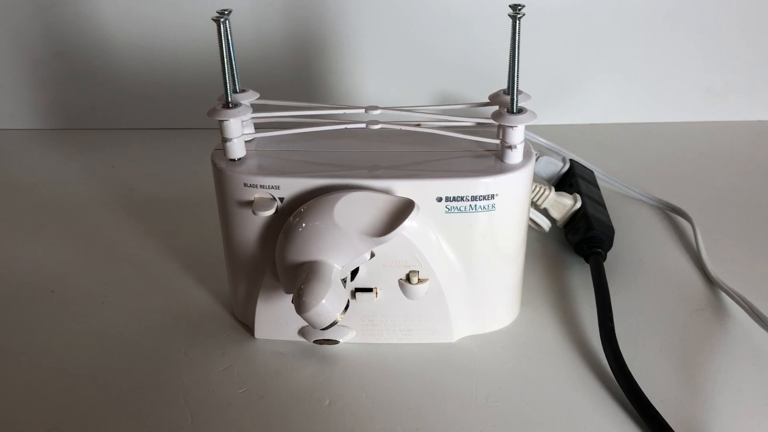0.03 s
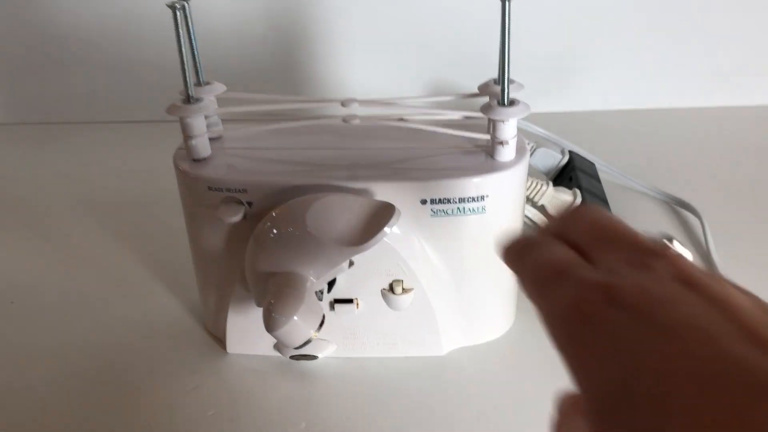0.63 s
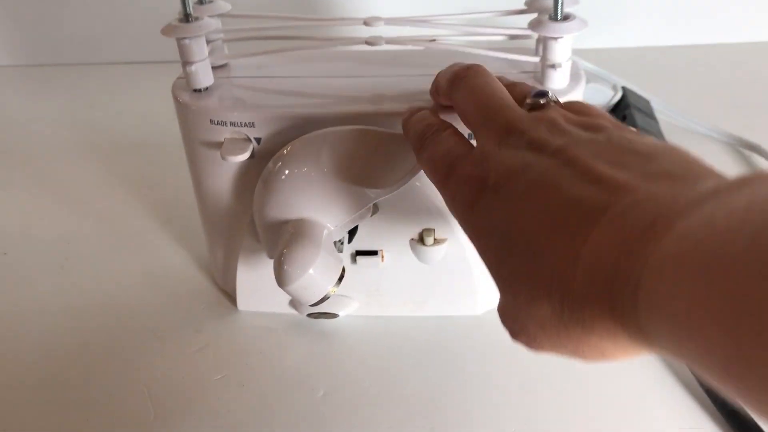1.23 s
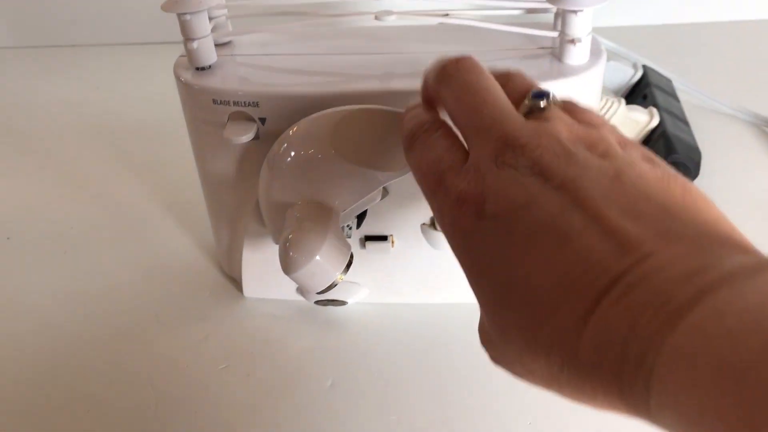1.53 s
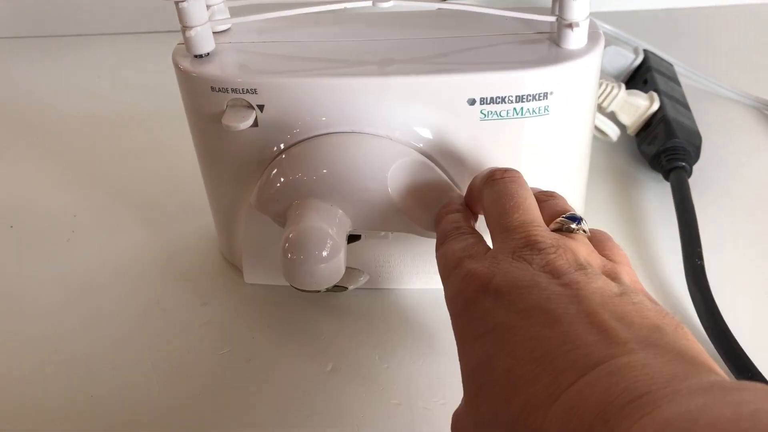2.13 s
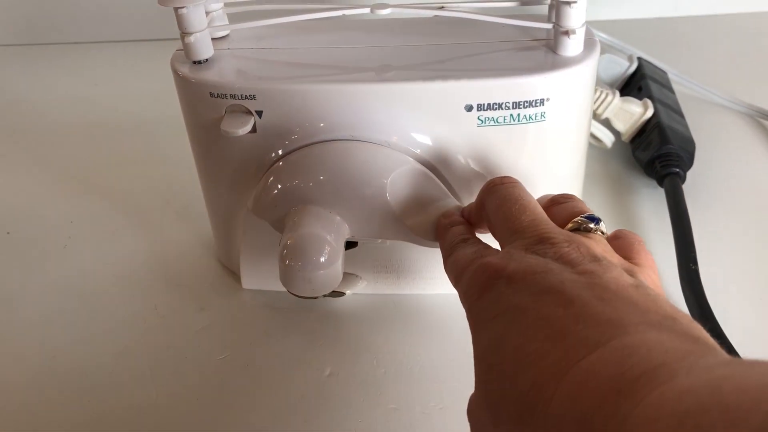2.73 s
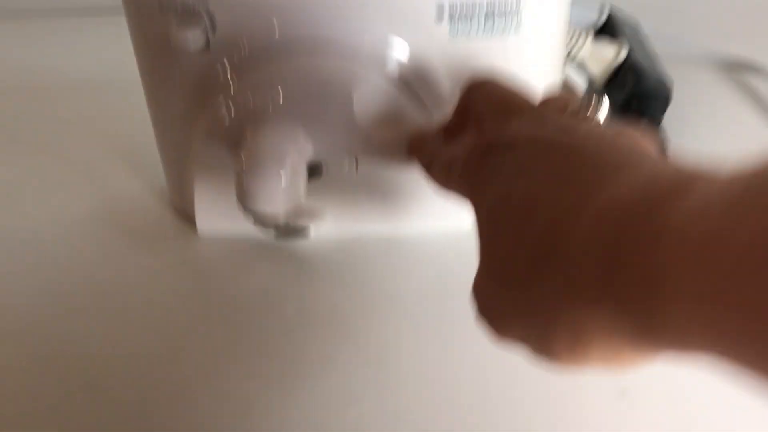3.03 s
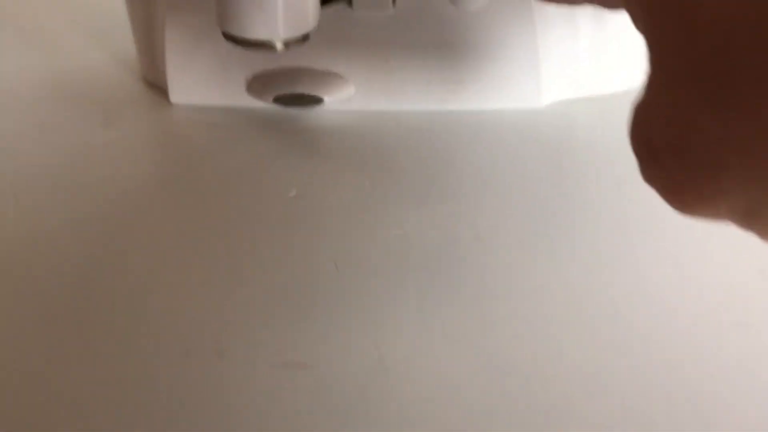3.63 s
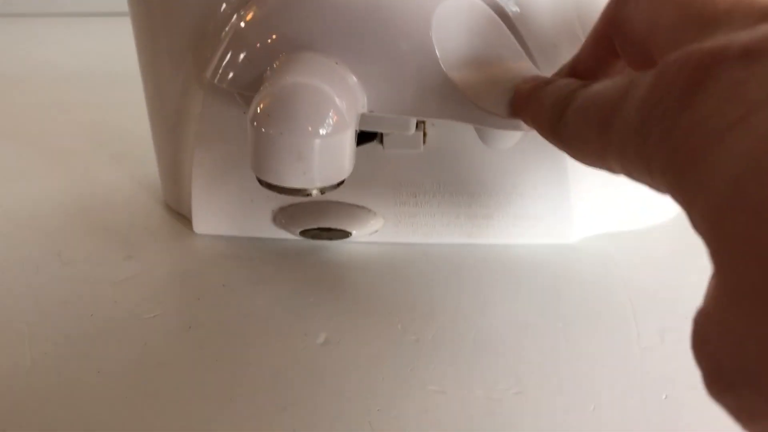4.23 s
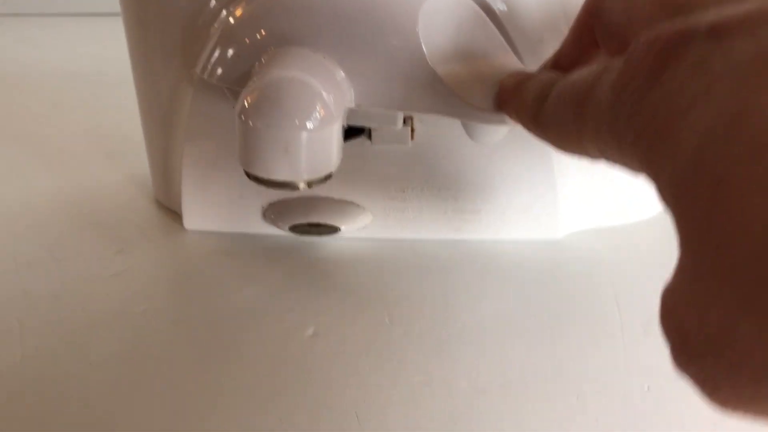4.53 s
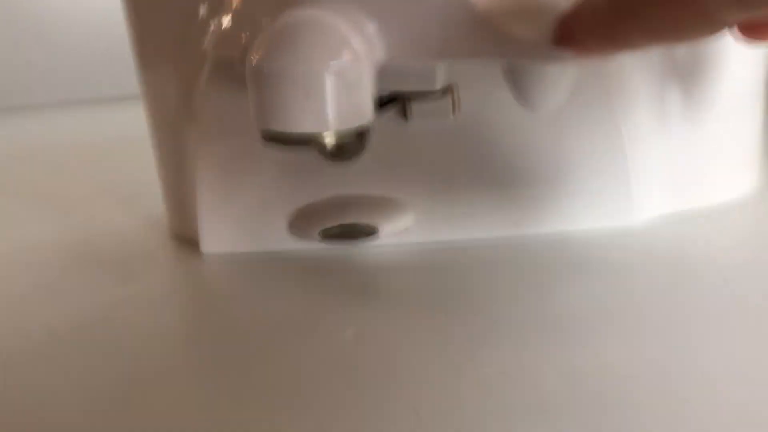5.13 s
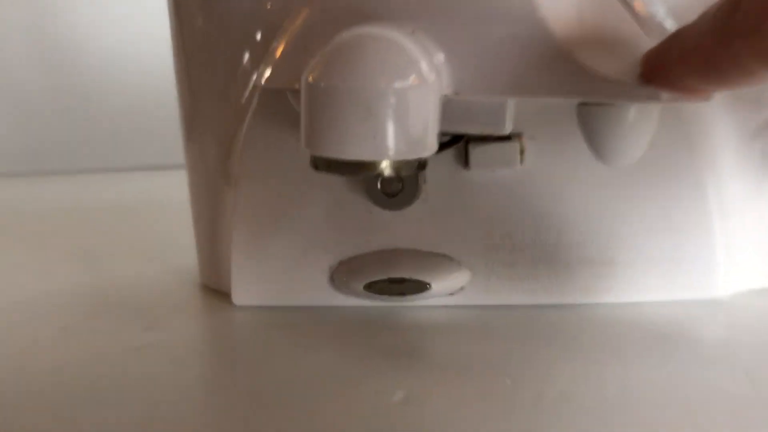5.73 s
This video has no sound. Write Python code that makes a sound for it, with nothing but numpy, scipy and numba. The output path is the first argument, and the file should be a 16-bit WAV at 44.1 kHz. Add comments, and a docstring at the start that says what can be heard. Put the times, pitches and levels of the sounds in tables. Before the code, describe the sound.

Indoors at a counter, a sleeve rustles faintly over low room rumble. The plastic lever of a small electric can opener slides, squeaks softly, ticks and snaps home with a sharp click. The motor starts at once and runs loudly, its hum pulsing and its gears rattling and knocking in the plastic housing. The close, hand-held microphone moves nearer, with a few dull handling thuds.

```python
"""A sleeve rustles faintly over low room rumble, indoors at a counter. Close to the hand-held microphone,
the plastic lever of a small electric can opener slides, squeaks and snaps home, and a mains induction
motor starts. Its pulsing torque rattles the unloaded gears in the plastic housing; the rotor slips
behind the mains, so about five times a second the hum sags and the teeth knock in a volley. The
microphone moves in on the front of the opener, with a few dull handling thuds."""
import sys
import numpy as np
from scipy import signal
from scipy.fft import rfft, irfft
from scipy.io import wavfile
from scipy.ndimage import map_coordinates
from numba import njit

SR = 44100
rng = np.random.default_rng(int(sys.argv[2]) if len(sys.argv) > 2 else 0)


def wrap_up_sound(samples):
    """Save the sound to the file named by the first command line argument, as 16-bit audio."""
    columns = np.atleast_2d(samples).T
    # keep every value between -1 and 1, then stretch to whole-number steps
    tamed = np.clip(columns, -1, 1)
    steps = np.round(tamed * 32767).astype(np.int16)
    wavfile.write(sys.argv[1], SR, steps)


N = 259749
T = np.arange(N) / SR

MAINS_HZ, ROTOR_HZ, BEAT_AT_S = 60, 57.6, 2.671
MOTOR_ON_S, SPIN_UP_S, GEARS_ON_S = 2.359, 0.038, 2.39

# Smooth spectra. Each row: frequency in Hz, relative level in dB.
AIR_COLOUR = [(15, -89), (25, -56), (55, -8), (108, -4.5), (149, -7), (212, -16.5), (242, -16),
              (545, -28.5), (641, -29), (911, -32.5), (1330, -33), (1440, -37), (16000, -53)]  # low rumble of the room
ROOM_COLOUR = [(100, 0.5), (500, -3), (2000, -4), (3000, -4), (3800, -10), (4800, 3), (6000, -12),
               (10000, 6.5), (16000, -10)]  # reflections from the walls
SLEEVE_COLOUR = [(200, -23), (1000, -2.5), (2800, -6), (5000, 0), (8000, -3.5), (16000, -7)]
SCUFF_COLOUR = [(60, -22), (150, -6), (330, 2), (520, 4), (700, -7), (950, 0), (1500, -15), (4000, -31)]
SQUEAK_COLOUR = [(500, -25), (1400, -14), (2800, -1), (4200, -2), (5700, -10), (7000, -3), (9000, -10),
                 (13000, -10), (15300, -7)]
LEVER_COLOUR = [(100, -22), (350, 8), (1000, 4), (8000, -1.5), (10000, 0), (12000, -4), (16000, -5)]
WASH_COLOUR = [(100, -7), (600, -8), (1500, 4), (2800, 4), (3800, 8.5), (4800, 2), (7000, 1), (9500, 3.5),
               (12000, -6), (16000, -13)]  # wash after a snap
MESH_FORCE = [(30, -52), (60, -64), (150, -9), (200, -9.5), (250, -1), (350, -3.5), (520, -7), (700, -3),
              (1600, -0.5), (2400, -6), (4400, -11), (7500, -15.5), (10000, -24.5), (16000, -39)]  # rolling teeth
KNOCK_FORCE = [(60, -29), (250, -9.5), (600, -3), (1500, 9), (2400, 0.5), (4400, 1.5), (7500, 1),
               (9500, -6), (16000, -13.5)]  # knocking teeth

# Resonances and, with negative lift, gaps. Each row: centre in Hz, width in Hz, lift in dB.
PIVOT_PEAKS = [(623, 320, 16), (950, 160, 9), (1510, 260, 16), (2900, 340, 12), (3350, 200, 15),
               (3800, 180, 11.5), (4200, 220, 13), (6900, 900, 4)]  # lever sliding
CRACK_PEAKS = [(560, 130, -22), (1100, 140, 6.5), (1520, 260, 3), (2090, 170, 6.5), (2520, 270, -7),
               (2970, 150, 6), (3830, 440, 9), (5070, 600, 1), (5570, 360, -3), (6300, 300, -4),
               (7300, 800, 4)]  # lever cracking
WASH_PEAKS = [(2020, 200, 3), (3640, 220, 7.5), (4000, 240, 4), (4900, 350, -11), (6500, 400, 4),
              (8700, 500, 3)]
HOUSING_PEAKS = [(257, 30, 5.5), (292, 47, 11.5), (409, 50, 7.5), (460, 38, 10.5), (623, 116, 11),
                 (777, 98, 8), (926, 105, 8), (1121, 80, 6.5), (1287, 132, 6), (1450, 78, -0.5),
                 (1800, 130, -0.5), (2350, 83, -2.5), (2520, 170, 4.5), (3680, 180, 3), (4600, 210, -3),
                 (4820, 220, 2.5), (5380, 150, 1), (6140, 200, 3.5), (6500, 150, -4), (7120, 410, 2),
                 (8040, 350, 4), (9600, 830, -3.5), (9650, 200, 7.5), (10900, 140, 5), (11800, 950, 4.5),
                 (14350, 1900, 6.5)]

# Rubs. Each row: start in seconds, length in seconds, level in dB.
SLEEVE_STROKES = [(0.12, 0.38, -65.5), (0.52, 0.27, -73.5)]  # the arm reaches out
PIVOT_STROKES = [(1.295, 0.02, -71.5), (1.4, 0.096, -72), (1.6, 0.05, -83), (1.68, 0.084, -76.5)]  # lever on its pivot
SCUFF_STROKES = [(5.035, 0.033, -34.5)]  # housing on the counter

# Thuds of the housing on the counter and of the hand on the microphone.
# Each row: start in seconds, level in dB, first pitch in Hz, final pitch in Hz, t60 in seconds.
THUDS = [(1.922, -55, 385, 330, .05), (2.085, -45, 254, 230, 0.092), (2.162, -42, 343, 150, 0.22),
         (2.358, -31.5, 285, 246, 0.059), (4.73, -45, 108.5, 95, .15), (5.046, -41, 170, 130, 0.12),
         (5.068, -40, 80, 55, 0.1), (5.145, -40, 147, 132, 0.15), (5.779, -46, 90, 80, .15)]

# Lever contacts. Each row: start in seconds, relative crack level in dB, crack centre in Hz,
# crack t60 in seconds, ring of the lever in dB, ring of the latch in dB.
LEVER_CONTACTS = [(1.799, -53, 3300, 0.012, -59, -74), (1.858, -48, 11000, 0.023, -70, -77),
                  (1.919, -42, 1700, 0.029, -46, -58), (1.92, -44, 13000, 0.018, -70, -75),
                  (2.078, -52, 550, .04, -78, -90), (2.087, -53, 600, 0.057, -70, -80),
                  (2.1045, -24.5, 7500, 0.011, -15, -40), (2.1312, -50, 9000, .012, -34, -64),
                  (2.15, -23, 7800, 0.043, -41, -32), (2.154, -0.5, 9000, 0.0055, -33, -17),
                  (2.1546, -17, 5500, 0.015, -33, -30)]
# Modes of lever and latch. Each row: frequency in Hz, relative level in dB, t60 in seconds.
LEVER_MODES = [(794, -34, 0.06), (1090, -39, 0.036), (1530, -25, 0.034), (2090, -13, 0.036),
               (2620, -14, 0.012), (3000, -30, 0.064), (3200, -12, 0.0083), (3750, -14, 0.012),
               (6540, -17.5, .011), (7900, -19, 0.013)]
LATCH_MODES = [(1070, -14.5, 0.016), (1500, -11.5, 0.02), (1950, -13, .014), (3580, -0.5, 0.014),
               (5620, -0.5, .012), (7300, -1, 0.007), (9200, -3, 0.0076), (10560, -7, .009)]

# Stator tones. Each row: multiple of the mains, added multiple of the rotor speed,
# relative level in dB, share that throbs from 0 to 1.
HUM_TONES = [(1, 0, -64.5, 0), (2, 0, -54, 0), (2, 1, -60, 0.2), (4, 0, -34, 0.69), (4, 1, -50.5, 0),
             (6, 1, -55, 0.7), (10, 0, -53, 0), (12, 0, -50, 0.5)]
# Hard knocks of the teeth, mostly in volleys at the slip beats, one rotor turn apart.
# Each row: start in seconds, relative level in dB, treble gain in dB.
CLACKS = [(2.386, -20.5, 1.5), (2.4477, -18, -1), (2.4813, -11.5, -1), (2.4984, -15, -1.5),
          (2.5762, -22.5, 5), (2.674, -9, -4.5), (2.6902, -17, 0), (2.707, -14, 1.5), (2.768, -21.5, 4),
          (2.7836, -20, 3.5), (2.8985, -15, 5), (2.9157, -16.5, 2), (2.975, -18.5, 2), (2.9931, -18, 3),
          (3.09, -10.5, -2), (3.107, -13, 3.5), (3.1243, -12.5, -5), (3.2017, -18, 6), (3.3149, -11.5, 1),
          (3.3319, -18, 0), (3.3893, -16, -3), (3.508, -15, -1), (3.524, -13, 2), (3.5411, -11.5, -4.5),
          (3.6178, -24.5, 12.5), (3.7156, -12.5, -3), (3.7321, -11.5, -0.5), (3.7933, -14.5, -3),
          (3.8654, -10, -6), (3.9233, -9, -0.5), (3.9407, -16, 1), (4.0347, -19.5, 2), (4.0522, -21, 2),
          (4.1313, -12.5, -2), (4.1486, -14, 1.5), (4.2204, -14, -3), (4.2262, -13.5, 0), (4.2819, -9.5, 1),
          (4.315, -14.5, 4), (4.3405, -9, -0.5), (4.357, -14, 4), (4.3908, -15, 2.5), (4.4356, -22, 7),
          (4.469, -22, 7), (4.5474, -17, 4), (4.566, -14, 1), (4.656, -17, 0), (4.757, -11, 0),
          (4.7741, -12, 0), (4.782, -15.5, -2), (4.9649, -12.5, 1.5), (4.9906, -21, 6), (5.0592, -16, -2),
          (5.0772, -17, 1), (5.1733, -10, -1.5), (5.191, -11.5, 0), (5.2089, -12.5, -1), (5.265, -12.5, 1),
          (5.2848, -13.5, -2), (5.357, -10, -12), (5.3655, -13, -7), (5.3728, -7.5, -2), (5.383, -12, -4),
          (5.4, -10, -2), (5.4933, -15.5, -3), (5.5578, -16, 0), (5.5654, -9, -3), (5.5905, -8.5, 1.5),
          (5.6068, -8, -4), (5.7992, -8, -9), (5.8148, -15, -2), (5.8261, -20, 4), (5.8658, -16.5, -1)]

# Parts that ring with the gears. Each row: centre in Hz, width in Hz, relative level in dB.
CUTTER_MODES = [(2970, 170, -6), (3617, 146, 0.5)]
BRACKET_MODES = [(3920, 52, 0)]  # holds the cutter
WHEEL_MODES = [(3095, 190, 4.5), (5520, 190, -3.5), (6650, 260, -0.5), (10400, 570, -4)]  # toothed feed wheel
CAVITY_MODES = [(706, 130, 0)]  # air in the housing
# The microphone comes down in front of the opener. Each row: time in seconds, gain from nearness in dB,
# then the ring of cutter, bracket, wheel and cavity, each in dB.
MIC_APPROACH = [(2.5, 0, -21, -12, -3, -3), (3.0, 0, 2, -1, -4, -4), (3.45, 1.24, 12, 11, -30, -3),
                (4.0, 3, 8.5, 6, -9, -36), (4.9, 2.5, 9.5, 1, -8, -36), (5.25, 4, 9.5, -11, -0.5, -15),
                (5.85, 3.5, 5, -8, 4, -18)]
# Front panel resonance, moving under the hand, with a hollow on each side. Each row: time in seconds,
# centre in Hz, relative lift in dB, upper hollow in Hz, upper and lower hollow depths from 0 to 1.
PANEL_PATH = [(2.8, 1994, 10, 2450, 0.86, 0.7), (3.3, 2030, 16, 2370, 0.3, 1),
              (3.46, 2050, 17.5, 2350, .45, 0.7), (3.54, 2010, 19.5, 2360, 0.5, 0),
              (3.59, 2000, 13, 2320, 0.6, .05), (3.7, 1880, 13.5, 2250, 0.6, .02),
              (4.0, 1850, 10, 2090, 0.45, .02), (4.45, 1880, 9.5, 2100, 0.3, .02),
              (4.95, 1930, 11.5, 2250, .4, .02), (5.4, 1970, 14.5, 2320, 0, 0.17),
              (5.87, 2040, 15.5, 2380, .1, .02)]


def undb(db):
    """Decibels to gain."""
    return 10 ** (np.asarray(db) / 20)


def unit(x):
    """Scale to rms 1."""
    return x / np.sqrt(np.mean(x ** 2))


def fade(t, t60):
    """Exponential decay by 60 dB in t60 seconds."""
    return np.exp(-np.log(1000) * t / t60)


def curve(rows):
    """Each value column of a timed table, at every sample."""
    times, *columns = np.transpose(rows)
    return [np.interp(T, times, column) for column in columns]


def waver(rate_hz):
    """Random drift between knots with a spread of 1."""
    knots = rng.standard_normal(256)
    return np.interp(T * rate_hz, np.arange(len(knots)), knots)


def highpass(x, hz, order=2):
    """Cut the bass below hz."""
    return signal.sosfilt(signal.butter(order, hz, "high", fs=SR, output="sos"), x)


def colour(x, points, peaks=(), size=8192):
    """Causal filter from a smooth spectrum with resonant peaks on it."""
    freqs = np.maximum(np.arange(size // 2 + 1) * SR / size, 1)
    hz, db = np.transpose(points)
    smooth_db = np.interp(np.log(freqs), np.log(hz), db)
    peak_db = sum(lift / (1 + (2 * (freqs - centre) / width) ** 2) for centre, width, lift in peaks)
    cepstrum = irfft(np.log(undb(smooth_db + peak_db)))
    cepstrum[1:size // 2] *= 2  # fold to minimum phase
    cepstrum[size // 2 + 1:] = 0
    return signal.fftconvolve(x, irfft(np.exp(rfft(cepstrum))))[:len(x)]


def noise(points, peaks=()):
    """Coloured noise at rms 1."""
    return unit(colour(rng.standard_normal(N), points, peaks))


@njit
def resonate(x, hz, width_hz):
    """State-variable band-pass whose centre may move."""
    y, band_state, low_state = np.empty(len(x)), 0., 0.
    for i in range(len(x)):
        gain, damping = np.tan(np.pi * hz[i] / SR), width_hz / hz[i]
        band = (band_state + gain * (x[i] - low_state)) / (1 + gain * (gain + damping))
        band_state = 2 * band - band_state
        low_state += 2 * gain * band
        y[i] = damping * band
    return y


def bandpass(x, hz, width_hz):
    """A resonance that stays at one pitch."""
    return resonate(x, np.full(len(x), float(hz)), float(width_hz))


def place(times, sounds):
    """Sum short sounds (rows) onto the time line."""
    at = (np.asarray(times) * SR).astype(int)[:, None] + np.arange(sounds.shape[1])
    return np.bincount(np.maximum(at, 0).ravel(), sounds.ravel(), N)[:N]


def impacts(times, strengths, t60, size=400):
    """Each impact is a burst of micro-contacts that dies within milliseconds."""
    bursts = rng.standard_normal((len(times), size)) * fade(T[:size], t60)
    return place(times, bursts * (strengths / np.linalg.norm(bursts, axis=1))[:, None])


def ring(modes, t):
    """Sound radiated by struck modes."""
    return sum(undb(db) * np.cos(2 * np.pi * hz * t + rng.uniform(0, 2 * np.pi)) * fade(t, t60)
               for hz, db, t60 in modes)


def strokes(rows, attack_s, release_t60):
    """Level of a series of rubs: each one rises, holds and dies away."""
    return sum(undb(db) * np.clip((T - start) / attack_s, 0, 1)
               * fade(np.maximum(T - start - length, 0), release_t60) for start, length, db in rows)


def room_tone(level_db=-60):
    """Low, steady rumble of the air indoors."""
    return undb(level_db) * noise(AIR_COLOUR)


def room_reflections(x, wet_db=-11, gap_s=0.0095, t60=0.16, size=22050):
    """The walls of a small room answer after a short gap."""
    t = T[:size]
    tail = rng.standard_normal(size) * fade(t, t60) * (t > gap_s)
    return undb(wet_db) * colour(signal.fftconvolve(x, tail / np.linalg.norm(tail))[:N], ROOM_COLOUR)


def snap_wash(x, wet_db=-12.5, gap_s=0.012, t60=0.36, early_db=7.0, early_t60=0.12, size=22050):
    """A snap comes back, first from near walls, as a smooth wash that follows its crack's energy."""
    t = T[:size]
    decay = (fade(t, t60) ** 2 + (undb(early_db) * fade(t, early_t60)) ** 2) * (t > gap_s)
    energy = signal.fftconvolve(highpass(x, hz=5000) ** 2, decay / decay.sum())[:N]
    return undb(wet_db) * np.sqrt(np.maximum(energy, 0)) * noise(WASH_COLOUR, WASH_PEAKS)


def counter_bounce(x, bounce_db=-12, lag_s=0.00128, sway_s=.00008):
    """The counter mirrors the treble; as the microphone sways, the path and metallic colour change."""
    delayed_s = T - lag_s - sway_s * waver(3.05)
    return undb(bounce_db) * map_coordinates(highpass(x, hz=4200), [delayed_s * SR])


def sleeve():
    """Cloth slides softly as the arm reaches out."""
    return strokes(SLEEVE_STROKES, attack_s=0.065, release_t60=0.38) * noise(SLEEVE_COLOUR)


def thuds(size=9000, settle_t60=0.12, rise_t60=0.0083):
    """Soft, low thuds that sink in pitch as the contact relaxes."""
    t, sounds = T[:size], []
    for _, db, start_hz, final_hz, t60 in THUDS:
        hz = final_hz + (start_hz - final_hz) * fade(t, settle_t60)
        envelope = undb(db) * fade(t, t60) * (1 - fade(t, rise_t60))
        sounds.append(envelope * np.sin(2 * np.pi * np.cumsum(hz) / SR))
    return place([row[0] for row in THUDS], np.array(sounds))


def scuff(grit_db=4):
    """The opener's feet judder over the counter: a short, rough, low rub."""
    grit = rng.standard_normal(N) * undb(grit_db * waver(40))
    return strokes(SCUFF_STROKES, attack_s=.012, release_t60=0.074) * unit(colour(grit, SCUFF_COLOUR))


def pivot_squeak(at_s=1.65, half_width_s=.032, slip_hz=1420, level_db=-68.5, jitter=.05, scatter_db=3):
    """The pivot sticks and slips fast and unevenly, swelling and fading in a moment."""
    count = 400
    chance = rng.standard_normal((count, 2))
    times = at_s + (np.cumsum(1 + jitter * chance[:, 0]) - count / 2) / slip_hz
    slips = colour(place(times, undb(scatter_db * chance[:, 1:])), SQUEAK_COLOUR)
    slips = unit(slips) * np.sqrt(count / slip_hz / T[-1])  # rms 1 while they last
    return undb(level_db) * slips * np.exp(-((T - at_s) / half_width_s) ** 2)


def lever(grip_db=3, size=8000):
    """The lever slides, ticks, catches and snaps home: each contact cracks and rings lever and latch."""
    t, cracks = T[:size], []
    for _, crack_db, hz, t60, *_ in LEVER_CONTACTS:
        grit = bandpass(rng.choice([-1., 1.], size), hz, width_hz=2 * hz)
        cracks.append(undb(crack_db) / 2 * unit(grit) * fade(t, t60))
    times, *_, lever_db, latch_db = np.transpose(LEVER_CONTACTS)
    cracking = colour(place(times, np.array(cracks)), LEVER_COLOUR, CRACK_PEAKS)
    rings = undb(lever_db)[:, None] * ring(LEVER_MODES, t)
    rings += undb(latch_db)[:, None] * ring(LATCH_MODES, t)
    rub = undb(grip_db * waver(35.06)) * strokes(PIVOT_STROKES, attack_s=0.015, release_t60=0.57)
    return cracking + place(times, rings) + rub * noise(LEVER_COLOUR, PIVOT_PEAKS)


def spin():
    """Share of full speed, 0-1: a jolt at switch-on, then a short run-up."""
    return np.sqrt(np.clip((T - MOTOR_ON_S) / SPIN_UP_S, 0, 1))


def slip_beat(t):
    """Phase 0-1 of the slip beat: the rotor falls one pole behind the field."""
    return (t - BEAT_AT_S) * 2 * (MAINS_HZ - ROTOR_HZ) % 1


def stator_hum(gain_db=-2, near_share=0.52, dip_width=0.17, dip_at=0.92, build_s=0.14, start_share=0.55):
    """Magnetic hum at mains multiples, with rotor side tones; it builds up and sags each slip beat."""
    from_dip = (slip_beat(T) - dip_at + .5) % 1 - .5
    dip = np.exp(-(from_dip / dip_width) ** 2)
    build = 1 - (1 - start_share) * np.exp(-np.maximum(T - MOTOR_ON_S, 0) / build_s)
    tones = np.zeros(N)
    for harmonic, turns, db, throb in HUM_TONES:
        hz = harmonic * MAINS_HZ + turns * ROTOR_HZ
        tone = np.sqrt(2) * np.sin(2 * np.pi * hz * T + rng.uniform(0, 2 * np.pi))
        tones += undb(db) * (1 - throb * dip) * tone
    # the hum spreads through the counter, so it gains only a share of the nearness
    near_db = near_share * curve(MIC_APPROACH)[0]
    return spin() * undb(gain_db + near_db) * build * tones


def gear_mesh(teeth=12, scatter_db=3.0, jitter_s=.0001, slide_db=2, pulsing=0.055, throb_db=1.5):
    """Pinion teeth roll into a worn gear: taps that repeat each gear turn, with sliding noise."""
    tooth = np.arange(int(N / SR * ROTOR_HZ * teeth))
    gear_teeth = teeth * teeth
    spacing = rng.uniform(-1.7, 1.7, (2, gear_teeth))[1, tooth % gear_teeth]
    timing, strength = rng.standard_normal((len(tooth), 2)).T
    times = (tooth + .3 * spacing) / (ROTOR_HZ * teeth) + jitter_s * timing
    # every tooth has its own short scrape, the same on each turn
    scrapes = rng.standard_normal((gear_teeth, 256)) * fade(T[:256], t60=0.0054)
    taps = place(times, scrapes[tooth % gear_teeth] * undb(scatter_db * strength)[:, None])
    sliding = undb(slide_db) * rng.standard_normal(N)
    torque = 1 + pulsing * np.cos(4 * np.pi * MAINS_HZ * T) * np.cos(2 * np.pi * ROTOR_HZ * T) ** 2
    force = (unit(taps) + sliding) * torque * undb(-throb_db * slip_beat(T))
    return unit(colour(force, MESH_FORCE, HOUSING_PEAKS))


def gear_rattle(pull_db=4.5, oval_db=5.5, scatter_db=6.5, throb_db=4, jitter_s=.0007, swing_s=.0007):
    """Each torque pulse throws the teeth across their backlash and back."""
    pulse = np.arange(int(N / SR * 2 * MAINS_HZ))
    times = np.concatenate([pulse + .2, pulse + .85]) / (2 * MAINS_HZ)
    timing, strength = rng.uniform(-1, 1, (len(times), 2)).T
    angle = 2 * np.pi * ROTOR_HZ * (times - BEAT_AT_S)
    # magnetic pull on the off-centre rotor makes some throws harder and earlier
    pull = np.cos(4 * np.pi * MAINS_HZ * (times - BEAT_AT_S) - angle - np.pi / 3)
    db = pull_db * pull + oval_db * np.cos(2 * angle) - throb_db * slip_beat(times)
    db = np.minimum(db + scatter_db * strength, 6)  # the backlash limits the throw
    throws = impacts(times + jitter_s * timing - swing_s * pull, undb(db), t60=0.013)
    return unit(colour(throws, KNOCK_FORCE, HOUSING_PEAKS))


def gear_clacks(gain_db=6.0, treble_hz=4500):
    """Teeth slam the housing, too briefly to move its bass; an edge-on contact ticks more sharply."""
    times, db, treble_db = np.transpose(CLACKS)
    slams = impacts(times, undb(db), t60=0.022, size=700)
    knocks = highpass(colour(slams, KNOCK_FORCE, HOUSING_PEAKS), hz=620)
    treble = signal.sosfiltfilt(signal.butter(2, treble_hz, "high", fs=SR, output="sos"), knocks)
    latest = np.maximum(np.searchsorted(times, T, side="right") - 1, 0)
    return undb(gain_db) * (knocks + (undb(treble_db)[latest] - 1) * treble)


def opener_body(gears, panel_db=-3.0, panel_waver=0.02):
    """The gears ring cutter, bracket, wheel, cavity and the front panel, which lies between hollows."""
    _, *parts_db = curve(MIC_APPROACH)
    panel_hz, lift_db, upper_hz, upper_depth, lower_depth = curve(PANEL_PATH)
    panel_hz = panel_hz * (1 + panel_waver * waver(12))
    body = gears + undb(panel_db + lift_db) * resonate(gears, panel_hz, width_hz=180.)
    for part_db, modes in zip(parts_db, (CUTTER_MODES, BRACKET_MODES, WHEEL_MODES, CAVITY_MODES)):
        body += undb(part_db) * sum(undb(db) * bandpass(gears, hz, width) for hz, width, db in modes)
    body -= upper_depth * resonate(body, upper_hz, width_hz=240.)
    return body - lower_depth * bandpass(body, hz=1730, width_hz=200)


def gear_train(mesh_db=-36, rattle_db=-40.5, loosen_s=0.088, rough_at_s=4.327, rough_width_s=0.041):
    """The mesh swells as the rotor spins up; the rattle builds as the teeth shake loose."""
    near_db = curve(MIC_APPROACH)[0]
    rough = np.exp(-((T - rough_at_s) / rough_width_s) ** 2)  # the gears run rougher for a moment
    rolling = spin() ** 3 * undb(mesh_db + near_db + 2 * rough) * gear_mesh()
    # slow teeth only rumble; the rasp comes with speed
    rumble = signal.sosfilt(signal.butter(3, 900, fs=SR, output="sos"), rolling)
    rasp = spin() ** 6 * (rolling - rumble)
    looseness = 1 - np.exp(-np.maximum(T - GEARS_ON_S, 0) / loosen_s)
    rattling = looseness * undb(rattle_db + near_db + 5.5 * rough) * gear_rattle()
    return rumble + rasp + rattling + gear_clacks()


def scene():
    """One microphone close to the opener; the hum reaches it straight from housing and counter."""
    clicks = lever()
    gears = opener_body(gear_train())
    gears += counter_bounce(gears)
    opener = clicks + gears + stator_hum()
    reflections = snap_wash(clicks) + room_reflections(gears)
    handling = pivot_squeak() + thuds() + scuff()
    return (opener + reflections + handling + room_tone() + sleeve())[None]


def record(dry, top_hz=16000):
    """The microphone fades in, drops the deepest bass and cuts the top."""
    faded_in = dry * np.clip((T - .05) / 0.031, 0, 1)
    top_cut = signal.ellip(8, .2, 80, top_hz, fs=SR, output="sos")
    return signal.sosfilt(top_cut, highpass(faded_in, hz=45, order=3))


dry = scene()
out = record(dry)
wrap_up_sound(out)
```